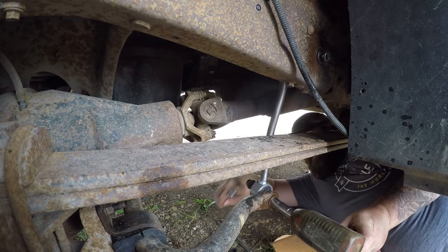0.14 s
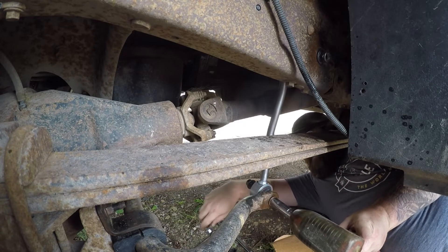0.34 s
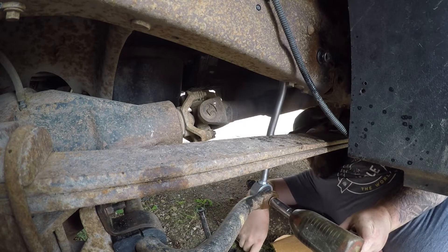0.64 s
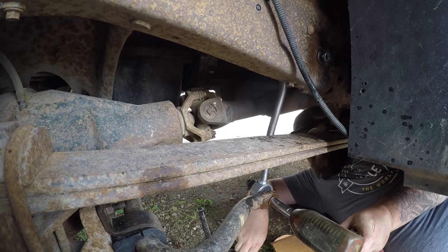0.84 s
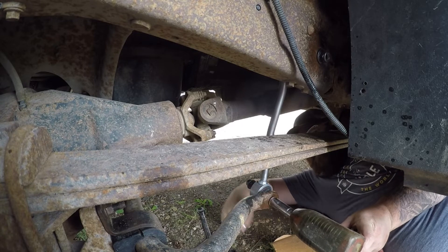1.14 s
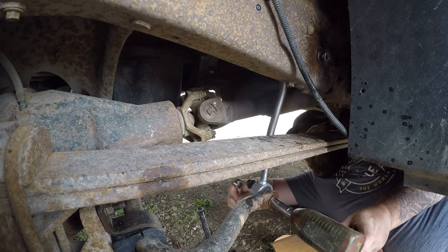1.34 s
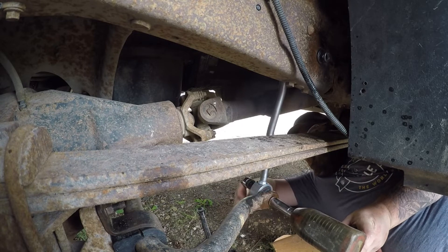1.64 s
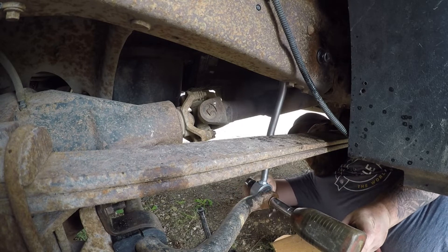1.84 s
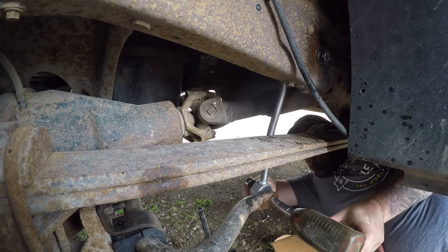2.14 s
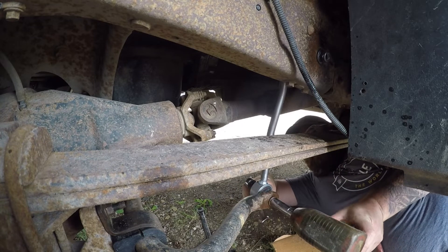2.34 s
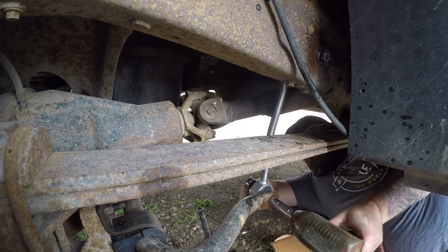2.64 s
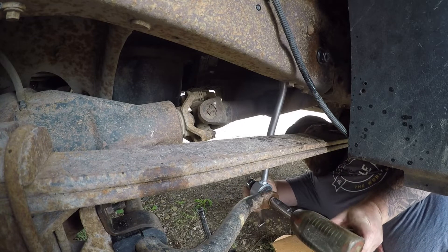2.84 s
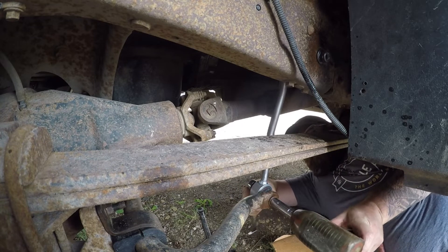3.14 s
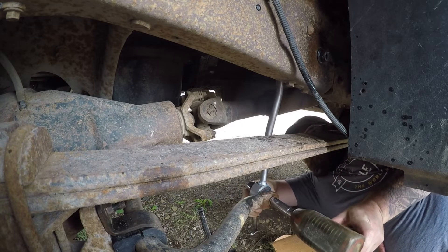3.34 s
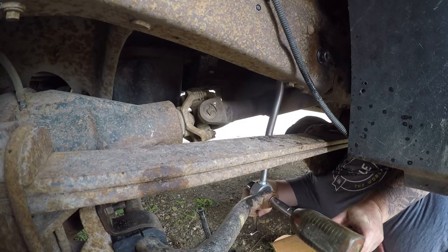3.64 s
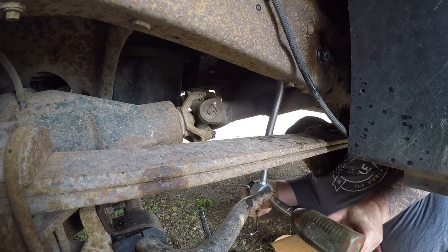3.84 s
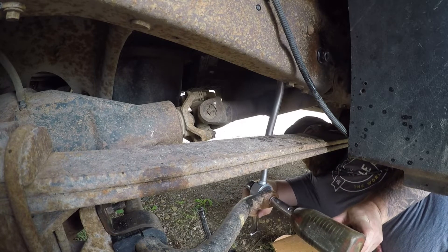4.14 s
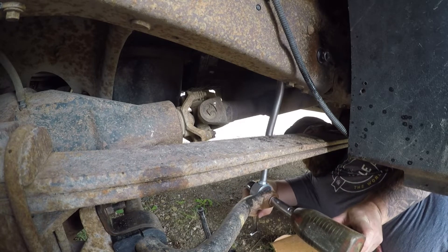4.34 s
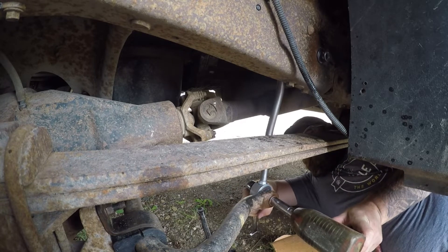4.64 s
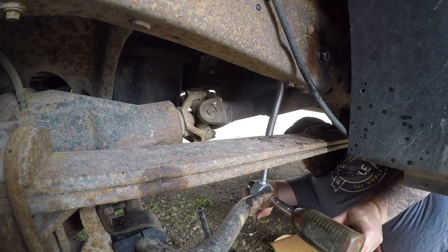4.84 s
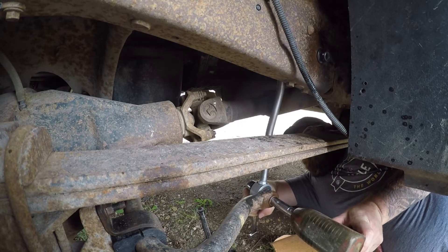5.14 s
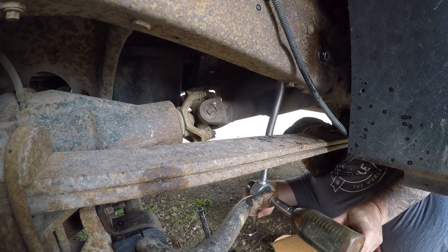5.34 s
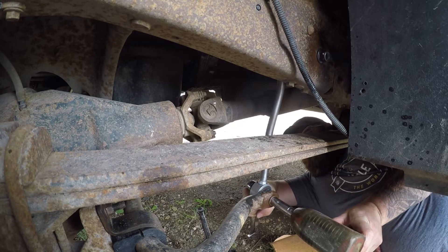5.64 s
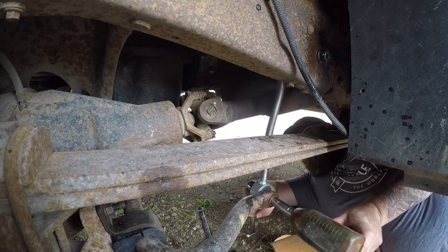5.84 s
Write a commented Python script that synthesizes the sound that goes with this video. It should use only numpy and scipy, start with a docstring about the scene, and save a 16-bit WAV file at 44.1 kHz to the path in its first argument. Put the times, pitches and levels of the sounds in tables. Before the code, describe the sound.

Dull thuds and a ringing steel clink come first, followed by a cluster of metallic clacks as a socket is fitted on a truck's steering linkage. A power ratchet grinds in two short bursts and a longer one, then whirs and chatters without a break. It is all heard close up in faint open air, with knocks and vibration booming through the chassis into the microphone.

```python
"""Under a truck, outdoors, close to the steering linkage, with a stereo microphone on the chassis.
A loose steel part clinks and a socket is knocked onto a nut. A cordless ratchet turns the nut in three
slow bursts, then spins it in one steady, rattling run, its gear teeth hammering the tool's resonances.
Knocks and the tool's shaking also reach the microphone through the chassis, as low thuds and shudder.
Behind it all is a low murmur of air; the image narrows almost to mono as the tool runs."""
import sys
import numpy as np
from scipy import signal
from scipy.fft import rfft, irfft, next_fast_len
from scipy.io import wavfile
from scipy.ndimage import map_coordinates

SR = 44100
rng = np.random.default_rng(int(sys.argv[2]) if len(sys.argv) > 2 else 0)


def output_pcm(signal):
    """Save a mono or channel-first signal as 16-bit PCM at the path in sys.argv[1].

    Samples are clipped to [-1, 1] before scaling.
    """
    pcm = np.clip(np.atleast_2d(signal).T, -1, 1) * 32767
    wavfile.write(sys.argv[1], SR, np.round(pcm).astype(np.int16))


N = 264600
TOP_HZ = 15350  # the microphone's band limit

# spectrum of the shaking chassis: (frequency [Hz], level [dB per Hz])
SHAKE_SPECTRUM = [(30, -36), (55, -5.5), (85, -10.5), (125, -4), (165, -2), (210, 0), (260, -12.5),
                  (330, -17), (430, -24.5), (700, -74)]
# socket and tool knock on the linkage: (time [s], steel tap [dB], chassis thud [dB], thud bass [dB])
LINKAGE_KNOCKS = [(0.001, -31.5, -14.5, 5.5), (0.0706, -27.5, -17.5, 9), (0.401, -39, -38.5, 6),
                  (1.023, -39.5, -58.5, -6), (1.1, -49, -38.5, -5), (1.254, -39.5, -69, -7.5),
                  (1.3791, -10.5, -39, 1.5), (1.387, -18, -19.5, 6), (1.431, -14.5, -31, 6),
                  (1.442, -28, -13.5, 6.5), (1.593, -35, -15, 4), (1.6886, -45.5, -10.5, -12),
                  (1.7618, -31.5, -18, -9), (1.775, -17, -16, -8), (1.792, -45, -18.5, 3),
                  (1.851, -58, -16.5, 1.5), (1.929, -44, -15, -1), (2.051, -72, -30.5, -5),
                  (2.133, -49.5, -33.5, 1), (3.7211, -20.5, -33, -5), (3.7862, -53, -49.5, -6),
                  (3.8417, -48.5, -57.5, -4)]


def ratchet():
    """The tool, close by: gear teeth and the loose socket hammer the steel, pulsing once a crank turn."""
    # crank speed, slow in the bursts and fast in the run: (time [s], speed [turns per s])
    crank_speed = [(3.68, 11.97), (3.88, 27.25), (4.1, 27.3), (4.3, 25.7), (4.45, 21.7), (4.7, 22.1),
                   (5.0, 21.7), (5.3, 20.8), (5.6, 19.4), (6.0, 22.3)]
    # how hard the socket bears on the nut: (time [s], load [0-1])
    socket_load = [(2.72, 0.84), (2.85, 0.52), (3.2, 0.16), (3.55, 0.06), (4.3, 0.12), (5.0, 0.13),
                   (6.0, 0.03)]
    # fine hiss of the spinning gears: (frequency [Hz], level [dB per Hz])
    gear_hiss = [(5590, -29.5), (9500, -0.5), (10700, -9.5), (12900, 1), (14700, -4), (15200, -9.5)]
    turns, load = np.cumsum(curve(crank_speed)) / SR, curve(socket_load)
    clack, rattle, sizzle, shake = trigger(load)
    teeth = impacts(turns, count=12, jitter=.025, pattern_db=3.5, scatter_db=4.5, uneven=.04)
    chatter = impacts(turns, count=48, jitter=.3, pattern_db=1.5, scatter_db=3.5, uneven=.5)
    pawl = impacts(turns, count=1, jitter=.004, pattern_db=0, scatter_db=3.5)
    blows = teeth + amp(1.5) * chatter + amp(-17) * pawl + amp(-6) * rng.standard_normal(N)
    steel = housing(blows, chatter, load)
    out = amp(-.78) * clack * band(steel, 350, 3300) * stroke(turns, depth_db=1.5, at=.96)
    out += amp(-6.5) * clack * (1 - load) * yoke(turns, pawl)
    out += rattle * band(steel, 3300, 10570) * stroke(turns, depth_db=.64, at=.1)
    # under load the steel rings at the top as well; spinning freely it only hisses
    top_ring = np.sqrt(load) * band(steel, 10240, TOP_HZ)
    hiss = amp(-2) * np.sqrt(1 - load) * band(coloured(blows, gear_hiss), 9500, TOP_HZ)
    out += sizzle * (top_ring + hiss) * stroke(turns, depth_db=.5, at=.7)
    return out + shake * chassis_shudder(turns, load) + amp(-39) * mount_boom(turns, clack)


def trigger(load):
    """Gains of clack, rattle, sizzle and shake: the steel answers at once, the heavy chassis slowly."""
    # trigger pulls: (start [s], stop [s], level [dB], drift of the rattle [dB per s])
    pulls = [(2.39, 2.712, 1.5, -19), (2.785, 2.958, -.5, -17), (3.003, 3.676, 0, 6.5),
             (3.884, 6.012, 3, 0)]
    # the top treble rises and falls: (time [s], level [dB])
    treble = [(2.45, 3.5), (2.6, -1.5), (3.25, 1), (3.5, -3.5), (4.0, -4), (4.7, -5.5), (5.45, 3), (6.0, 0)]
    t = np.arange(N) / SR
    steel = rattle = chassis = 0
    for start, stop, db, drift in pulls:
        running = amp(db) * gate(start - .013, stop, rise_s=.019, fall_s=.014)
        from_middle_s = np.clip(t, start, stop) - (start + stop) / 2
        steel += running
        rattle += running * amp(drift * from_middle_s)
        chassis += amp(db) * gate(start, stop, rise_s=.038, fall_s=.046)
    sizzle = steel * amp(-43.5 + curve(treble))
    shake = chassis * amp(-21 + 3 * np.log2(load + 1e-3))  # stronger under load
    return amp(-33.5) * steel, amp(-29.5) * rattle, sizzle, shake


def impacts(turns, count, jitter, pattern_db, scatter_db, uneven=0):
    """Count blows a crank turn: a repeating pattern of spacing and strength, scattered blow by blow."""
    teeth = np.arange(int(turns[-1] * count))
    offset, size = rng.standard_normal((2, count))[:, teeth % count]
    position = teeth + uneven * offset + jitter * rng.standard_normal(len(teeth))
    strength = amp(pattern_db * size + scatter_db * rng.standard_normal(len(teeth)))
    samples = np.minimum(np.searchsorted(turns * count, position), N - 1)
    return unit(np.bincount(samples, strength, N))


def housing(blows, chatter, load):
    """Tool and socket ring at one set of resonances when spinning freely, another when pressed tight."""
    # resonances spinning freely: (frequency [Hz], width [Hz], level [dB])
    free_peaks = [(568.4, 30, 2.5), (876, 58, -0.5), (1206, 46, -2.5), (1632, 160, -6.5), (2140, 36, -6),
                  (2373, 48, -8.5), (3430, 20, -22), (3280, 41, -21), (4424, 45, 2.5), (4860, 28, 0.5),
                  (5180, 40, -0.5), (5490, 50, 1.5), (6200, 49, -6.5), (6270, 30, -6.5), (6782, 130, -2.5),
                  (7570, 70, -10.5), (7950, 230, -10), (8180, 39, -3.5), (8810, 99, -9), (9510, 83, -13.5),
                  (10730, 140, -33.5), (11500, 85, -27.5), (11940, 35, -18), (13400, 67, -15.5),
                  (13250, 55, -13.5), (13700, 100, -40.5), (14590, 73, -17.5)]
    # resonances pressed onto the nut: (frequency [Hz], width [Hz], level [dB])
    tight_peaks = [(795, 69, -0.5), (2270, 57, -3.5), (3256, 78, -3), (3520, 230, -5), (4780, 89, -18),
                   (5350, 28, -16), (5600, 74, -4.5), (5680, 16, -5), (5864, 48, 4.5), (6380, 62, 2.5),
                   (6410, 36, -9), (6860, 63, 2.5), (7530, 30, -3), (7400, 46, 5), (8430, 110, -2.5),
                   (8200, 28, -18.5), (9470, 62, -6.5), (10076, 68, -9), (11270, 51, -17), (12600, 54, -23),
                   (13400, 130, -42), (14400, 77, -32)]
    # broad gear hash passed between the resonances: (frequency [Hz], level [dB per Hz])
    gear_hash = [(210, -36), (350, 1.5), (480, -27.5), (562, -9.5), (690, -7.5), (874, -0.5), (1040, -53),
                 (1200, -8), (1340, -11), (1750, -6.5), (2900, -7), (3450, -11), (4200, -2), (5370, -2),
                 (15200, -41)]
    # the turning socket keeps shifting its contact, so the resonances drift
    ringing = wander(resonate(blows, free_peaks), depth=.003945, rate_hz=25)
    free = ringing + amp(-5) * (unit(coloured(blows, gear_hash)) + noise(gear_hash))
    grind = chatter + rng.standard_normal(N)
    tight = resonate(grind, tight_peaks) + amp(-5.5) * noise(gear_hash)
    tight += amp(-8.5) * resonate(grind, [(934, 46, 0), (3040, 280, 0)])
    return np.sqrt(1 - load) * free + np.sqrt(load) * tight


def yoke(turns, pawl):
    """The yoke knocks at the end of each stroke."""
    drive = amp(-25) * pawl + rng.standard_normal(N) * stroke(turns, depth_db=6.5, at=.96)
    return resonate(drive, [(550, 33, -2), (880, 68, -1), (1198, 26, -.61)])


def chassis_shudder(turns, load):
    """The return stroke shakes the chassis under the microphone; under load its main mode takes over."""
    shudder = noise(SHAKE_SPECTRUM)
    shudder += 1.51 * load * resonate(rng.standard_normal(N), [(202.8, 10.2, -4), (120, 20.3, -11)])
    shudder += 1.04 * (1 - load) * resonate(rng.standard_normal(N), [(169.4, 55, 0)])
    return shudder / np.sqrt(1.28 + load) * stroke(turns, depth_db=1.5, at=.75)


def mount_boom(turns, drive, build_s=.35):
    """Twice the crank rate booms when it meets the lowest mode of the microphone mount."""
    swell = signal.lfilter([1], [1, -np.exp(-1 / (build_s * SR))], drive ** 2) ** 2
    return resonate(np.sin(4 * np.pi * turns) * swell, [(53.1, 1.4, 0)])


def thuds(attack_s=.0062, lag_s=.003, tremor_s=.3, bass_hz=170):
    """Just after each tap the chassis gives: it knocks, rings and trembles right under the microphone."""
    # modes of the chassis and microphone mount: (frequency [Hz], level [dB], t60 [s])
    chassis_modes = [(54.3, -31.5, 0.98), (81, -20, 0.14), (120, -3, 0.16), (148.5, -4.5, 0.208),
                     (196, -19, 0.14), (207.2, -2.5, 0.31), (233.5, 2, 0.15), (260, -20, 0.084),
                     (304.5, -21, 0.28)]
    # the frame's hard knock: (frequency [Hz], level [dB per Hz])
    knock_spectrum = [(200, -0.5), (300, 5.5), (380, -1.5), (470, 5), (570, -1), (750, -14.5), (1200, -27),
                      (2000, -28), (5000, -48.5)]
    out, energy, t = np.zeros(N), np.zeros(N), np.arange(SR) / SR
    for s, _, db, bass_db in LINKAGE_KNOCKS:
        modes = [(hz, level + bass_db * (hz < bass_hz), t60) for hz, level, t60 in chassis_modes]
        shudder = amp(-11) * noise(SHAKE_SPECTRUM, size=SR) * np.exp(-t / .042)
        knock = amp(-18) * noise(knock_spectrum, size=SR) * np.exp(-t / .033) * onset(t, .0011)
        body = onset(t, attack_s) * (ring(modes, t, scatter_db=2.5) + shudder)
        add(out, s + lag_s, amp(db) * (body + knock))
        trembling = amp(db) * onset(t, .031) * np.exp(-(t / tremor_s) ** 2)
        add(energy, s, trembling ** 2)
    tremor = resonate(rng.standard_normal(N), [(53.2, 5, 3), (129, 17, -6.5), (211.7, 11.6, -6.5)])
    return out + amp(-15) * np.sqrt(energy) * band(tremor, 37, 360)


def taps():
    """The socket scrapes onto the nut: a gritty crack, a dull clack and a short ring."""
    # modes of the socket: (frequency [Hz], level [dB], t60 [s])
    socket_modes = [(3185, -16.5, 0.18), (4100, -4.5, 0.11), (5110, -2.5, 0.12), (5650, -18.5, .14),
                    (6220, -16, 0.13), (6610, -19, 0.054), (7110, 7, .08), (8700, -36.5, .12),
                    (9609, -43, .15)]
    # crack of steel on steel: (frequency [Hz], level [dB per Hz])
    crack_spectrum = [(600, -26), (1700, -3), (4500, 6.5), (7500, 7), (9500, -1), (15000, -25.5)]
    out, t = np.zeros(N), np.arange(SR // 3) / SR
    fade = onset(t, .0013) * (np.exp(-t / .0068) + amp(-14) * np.exp(-t / .024))
    for s, db, thud_db, _ in LINKAGE_KNOCKS:
        crack = noise(crack_spectrum, size=len(t))
        clack_db = -8.5 + (thud_db - db) / 2  # follows tap and thud equally
        clack = amp(clack_db) * band(rng.standard_normal(len(t)), 450, 2000)
        ringing = ring(socket_modes, t, scatter_db=4.5)
        add(out, s, amp(db) * (amp(-11.5) * (crack + clack) * fade + amp(-20.5) * ringing))
    return out


def clink(grip_at_s=.62, damping_s=.022):
    """A bright steel ring over many weak partials, renewed by soft bounces until a hand stills it."""
    # a loose part strikes and settles: (time [s], ring [dB], jingle [dB], contact time [s])
    bounces = [(0.4005, -47.5, -55.5, 0.0025), (0.4238, -23.5, -17.5, 0.00017), (0.441, -42.5, -25.5, .004),
               (.474, -30, -25, 0.003), (0.495, -48, -27, .005), (0.592, -49, -39, .008)]
    # modes of that part: (frequency [Hz], level [dB], t60 [s])
    steel_modes = [(1044, -29, 1.0), (2020, -27.5, .3), (2972, -17.5, 1), (3440, -6, 0.14),
                   (5140, -19, 0.45), (5670, -17.5, 0.98), (5846, -13.5, 0.25), (5950, -3.5, 0.206),
                   (7180, 4.5, 0.2), (8100, -14.5, 0.34), (8170, -10.5, 0.86), (8540, -17, 0.428),
                   (9700, -19, 0.19), (9830, -8, .25), (10730, -13.5, 0.094), (10900, -11, .18),
                   (11640, -22.5, .4), (12350, -25.5, 0.5), (12800, -28, 0.214), (13900, -20, .55),
                   (15040, -23, .25)]
    # crack of each contact: (frequency [Hz], level [dB per Hz])
    crack_spectrum = [(1000, -26.5), (4500, -14), (5600, -2), (7200, 2), (9500, -1), (15000, -15)]
    out, t = np.zeros(N), np.arange(SR // 2) / SR
    weak_modes = [(hz, -17 - hz / 1000, .3) for hz in rng.uniform(5200, 14400, 45)]
    for s, ring_db, jingle_db, contact_s in bounces:
        crack = noise(crack_spectrum, size=len(t)) * np.exp(-t / .0036)
        jingle = amp(jingle_db) * (crack + ring(weak_modes, t, scatter_db=1))
        ringing = amp(ring_db) * ring(steel_modes, t, scatter_db=6)
        add(out, s, onset(t, contact_s) * (ringing + jingle))
    return out * np.exp(-np.maximum(np.arange(N) / SR - grip_at_s, 0) / damping_s)


def hand_brush():
    """A hand brushes once over the linkage."""
    # hand rubbing on steel: (frequency [Hz], level [dB per Hz])
    rub_spectrum = [(120, -27), (200, -13.5), (272, 0), (358, -28), (531, -10.5), (951, -20), (1190, -16),
                    (1560, -22), (2950, -25), (12000, -48.5), (15600, -80.5), (22000, -120)]
    return amp(-46.5) * gate(1.085, 1.136, rise_s=.011, fall_s=.06) * noise(rub_spectrum)


def outdoor_air():
    """A low murmur of open air around the truck."""
    # the murmur: (frequency [Hz], level [dB per Hz])
    air_spectrum = [(15, -44), (25, 3), (53, -1), (71, -2), (142, -14.5), (213, -4), (326, -22.5),
                    (879, -29.5), (1810, -35), (6720, -38.5), (7280, -37), (13500, -54.5), (15000, -56.5)]
    return amp(-51.5) * noise(air_spectrum)


def amp(db):
    """Decibels to gain."""
    return 10 ** (np.asarray(db) / 20)


def unit(x):
    """x scaled to rms 1."""
    return x / np.sqrt(np.mean(x ** 2) + 1e-20)


def along(points, hz):
    """(Hz, value) points read on a log axis."""
    f, v = np.transpose(points)
    return np.interp(np.log(hz + 1), np.log(f + 1), v)


def curve(points):
    """(s, value) points read at every sample."""
    return np.interp(np.arange(N) / SR, *np.transpose(points))


def filtered(x, response):
    """x times a complex response of frequency."""
    n = x.shape[-1]
    m = next_fast_len(n + SR // 4)
    return irfft(rfft(x, m) * response(np.fft.rfftfreq(m, 1 / SR)), m)[..., :n]


def coloured(x, spectrum):
    """x shaped by (Hz, dB) points."""
    return filtered(x, lambda f: amp(along(spectrum, f)))


def noise(spectrum, size=N):
    """Coloured noise of rms 1."""
    return unit(coloured(rng.standard_normal(size), spectrum))


def resonate(x, peaks):
    """x through resonances (frequency [Hz], width [Hz], level [dB]) of alternating sign, at rms 1."""
    def response(f):
        return sum((-1) ** k * amp(db) * 1j * f * width / (hz * hz - f * f + 1j * f * width)
                   for k, (hz, width, db) in enumerate(peaks))
    return unit(filtered(x, response))


def band(x, lo_hz, hi_hz):
    """One band of x, at rms 1."""
    return unit(filtered(x, lambda f: (f >= lo_hz) & (f < hi_hz)))


def ring(modes, t, scatter_db):
    """Decaying modes, struck at new strengths each time."""
    out = 0
    for hz, db, t60 in modes:
        strength = amp(db + scatter_db * rng.standard_normal())
        out += strength * amp(-60 * t / t60) * np.sin(2 * np.pi * hz * t)
    return out


def wander(x, depth, rate_hz):
    """The pitches of x drift a little, rate_hz times a second."""
    drift = np.interp(np.arange(N) * rate_hz / SR, np.arange(N // 100), rng.standard_normal(N // 100))
    return map_coordinates(x, [np.cumsum(1 + depth * drift)])


def stroke(turns, depth_db, at):
    """Gain that swells once a turn, at the given part of the turn."""
    return unit(amp(depth_db * np.cos(2 * np.pi * (turns - at))))


def onset(t, rise_s):
    """Gain that rises from 0 towards 1."""
    return 1 - np.exp(-t / rise_s)


def gate(start, stop, rise_s, fall_s):
    """Soft attack, hold and release."""
    t = np.arange(N) / SR
    attack = 1 - np.exp(-(np.maximum(t - start, 0) / rise_s) ** 2)
    return attack * np.exp(-np.maximum(t - stop, 0) / fall_s)


def add(track, s, sound):
    """Mix a sound into the track at time s."""
    i = round(s * SR)
    track[i:i + len(sound)] += sound[:N - i]


def scene(path_lag_s=.00137):
    """Sound reaches two microphone ports by different paths; the image narrows, bar the top treble."""
    # stereo width: (frequency [Hz], side gain [dB])
    width = [(30, -6), (55, 7.5), (100, -5), (200, 3), (300, -4.5), (600, -3), (900, 5), (2500, -0.5),
             (4200, -9), (5500, 5), (13000, -1)]
    # balance of the ports: (frequency [Hz], left minus right [dB])
    balance = [(30, -2), (125, 0), (250, 1), (500, 0), (11000, 0), (12500, -6)]
    mid = ratchet() + thuds() + taps() + clink() + outdoor_air() + hand_brush()
    # unequal paths turn the phase between the ports back and forth with frequency
    paths = lambda f: 1j * np.sqrt(2) * np.cos(2 * np.pi * f * path_lag_s)
    side = filtered(mid, lambda f: amp(along(width, f)) * paths(f))
    top = filtered(side, lambda f: f > 11700)
    narrowing = amp(-.5) * curve([(2.54, 1), (3.49, 0)])
    side = top + (side - top) * narrowing
    ports = np.array([mid + side, mid - side])
    return filtered(ports, lambda f: amp(np.outer([.5, -.5], along(balance, f))))


def record(dry):
    """The microphone passes nothing above its band limit."""
    return filtered(dry, lambda f: f < TOP_HZ)


dry = scene()
out = record(dry)
output_pcm(out)
```